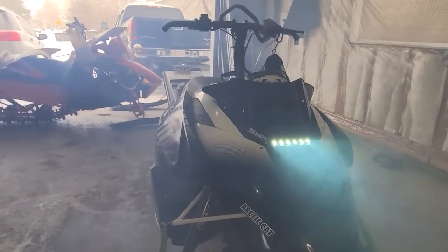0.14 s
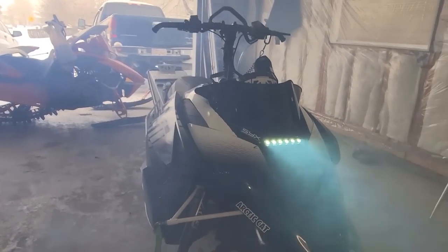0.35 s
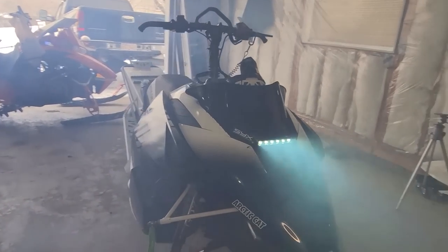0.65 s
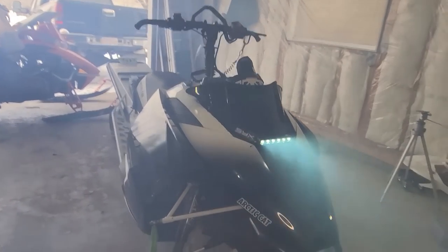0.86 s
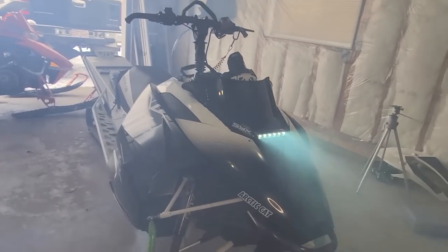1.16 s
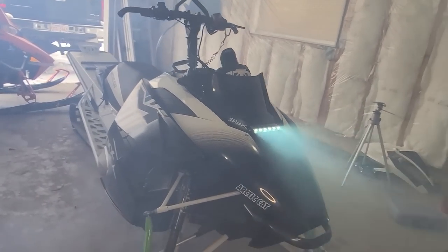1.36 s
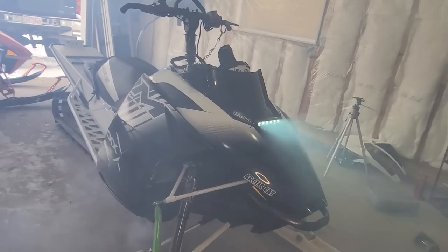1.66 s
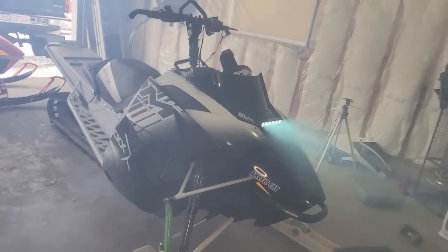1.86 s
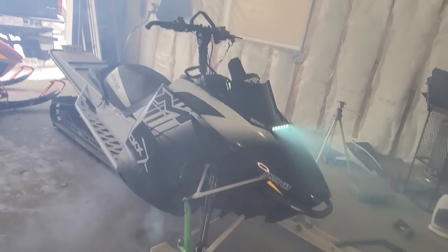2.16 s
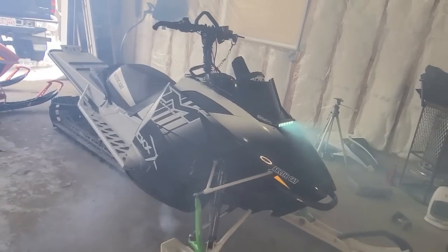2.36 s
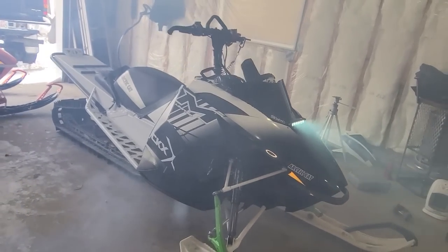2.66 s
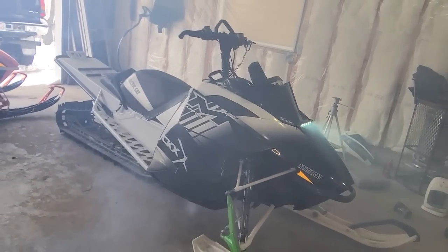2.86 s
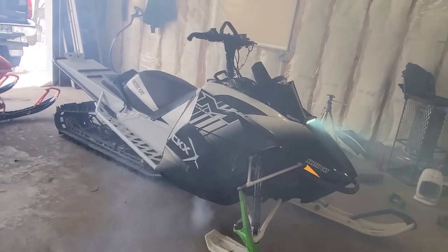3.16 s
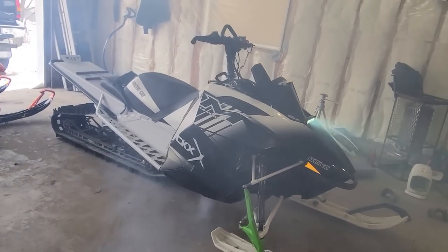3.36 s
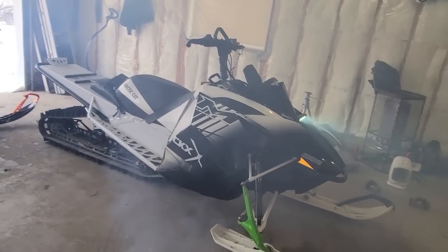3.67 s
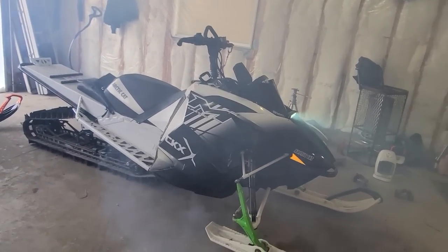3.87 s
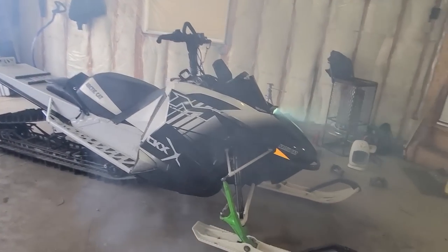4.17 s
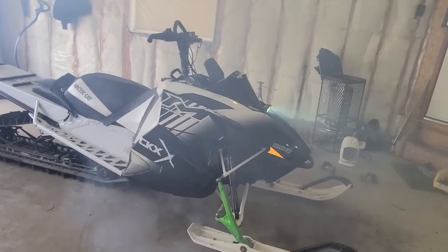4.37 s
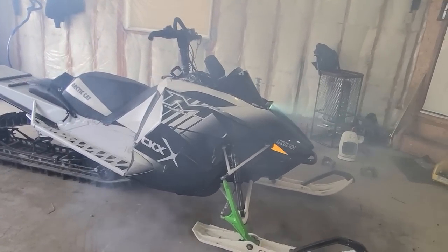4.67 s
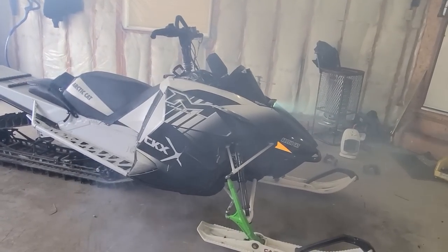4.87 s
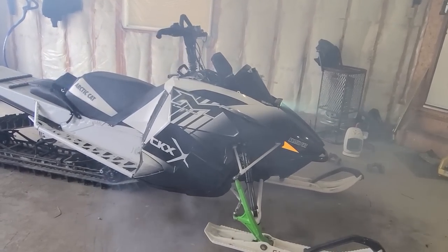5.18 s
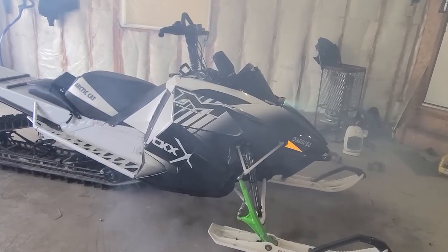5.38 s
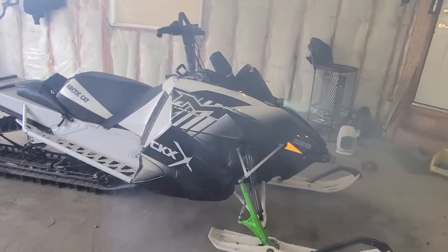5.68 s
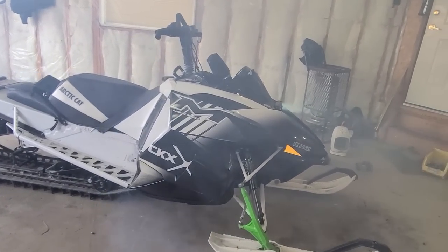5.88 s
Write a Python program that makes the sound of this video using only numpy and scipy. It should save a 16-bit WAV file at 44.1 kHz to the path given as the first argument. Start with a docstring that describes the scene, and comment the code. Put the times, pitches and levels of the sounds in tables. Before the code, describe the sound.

Indoors and close by, a snowmobile idles lumpily without revving or stopping. Boomy exhaust pops crack against a rapid pulsing hum, first a little slower and more ragged, then steadier. A clutch clanks briefly at the start, loose panels tick, and a dry garage adds a short tail. The moving stereo microphone hears tone shift from front vents towards the side.

```python
"""Uneven hard pops over a falling hum: a two-stroke snowmobile idles while the listener walks round its nose.
Only some strokes fire: each firing drives the exhaust resonances and kicks the crank up to speed.
The crank then coasts down, and its unfired strokes pump softer gas pulses through the same pipe.
Shock fronts ring the muffler shell; pistons, clutch, metal and panels clatter, with a thin high whistle.
A garage adds a short diffuse tail and a standing wave."""
import sys
import numpy as np
from scipy import signal
from scipy.fft import rfft, irfft
from scipy.io import wavfile
from scipy.ndimage import uniform_filter1d, minimum_filter1d

SR = 44100
rng = np.random.default_rng(int(sys.argv[2]) if len(sys.argv) > 2 else 0)


def store_wav(level_fs):
    """Save 16-bit WAV to argv[1]."""
    pcm = np.round(np.clip(np.atleast_2d(level_fs), -1, 1) * 32767)
    wavfile.write(sys.argv[1], SR, pcm.T.astype(np.int16))


N = 265923

# strokes that fire: [t/s, relative pop level/dB]
FIRINGS = [(0.0126, -6.5), (0.0522, -0.4), (0.071, 2.6), (0.2327, -1), (0.2875, 2.2), (0.378, -5),
           (0.4159, -7.5), (0.454, -4.5), (0.5111, 3.8), (0.5995, 2), (0.7569, 3.0), (0.8082, 4.6),
           (0.965, -7), (1.0012, 2), (1.0186, 0), (1.1673, 2), (1.2219, 3.0), (1.3452, 0.5), (1.4374, 3),
           (1.4901, 2.5), (1.65, 2.5), (1.7027, 3.5), (1.8933, 2.5), (1.9426, 0.9), (2.133, 3.5),
           (2.1496, 3.5), (2.3578, 3), (2.4072, 1.5), (2.554, 3), (2.6734, 2.5), (2.7215, 1.5),
           (2.8734, -3.3), (2.9258, 3), (2.9746, 1.5), (3.1606, 2.5), (3.1773, 2), (3.3729, 2), (3.4235, 3),
           (3.5823, 3.0), (3.6349, 2.5), (3.7932, 2.5), (3.8453, 3), (3.9997, 1.5), (4.0872, 2.5),
           (4.173, 1), (4.3016, 2), (4.3523, 2), (4.5397, 3.0), (4.5896, 3.0), (4.7365, 2), (4.7847, -0.7),
           (4.9553, 0.7), (4.9714, 3), (5.123, 0), (5.2117, 2.5), (5.2978, 0.6), (5.4235, -3), (5.479, 2),
           (5.5709, 1.5), (5.6582, 2), (5.7827, 1.2), (5.8349, 2), (6.0135, -5.5)]
# what the walk opens to the ear:
# [t/s, nose vent level/dB, airbox level/dB, buzzing bracket level/dB, body clatter level/dB]
FACING = [(0, 2, -11, -73, -29), (.6, -2, 2.5, -65, -30), (1.1, -4.5, -0.5, -58, -30.5),
          (2, -4.5, 4.5, -66, -31), (2.7, -14, 4.5, -53, -32), (3.5, -13, 4, -58, -34.5),
          (4.4, -13, 3.5, -59, -32), (5.1, -29, -5, -56, -33), (6.03, -31, -8, -65, -33)]


def from_db(db):
    """Amplitude gain is ten to the power of level/20."""
    return 10 ** (np.asarray(db) / 20)


def rms_one(x):
    """Normalise the mean power to one."""
    return x / np.sqrt(np.mean(x ** 2) + 1e-20)


def in_time(rows):
    """Linear interpolation turns each column into a per-sample curve."""
    s, *columns = np.transpose(rows)
    t = np.arange(N) / SR
    return [np.interp(t, s, column) for column in columns]


def at_hz(points, hz):
    """Interpolate a spectrum on a logarithmic frequency axis."""
    point_hz, values = np.array(points).T
    return np.interp(np.log(hz), np.log(point_hz), values)


def clicks(times, gains):
    """Unit-sample impulses, the ideal excitation, scaled by the gains."""
    at = np.round(times * SR).astype(int)
    out = np.full(N, 1e-18)
    inside = (at >= 0) & (at < N)
    np.add.at(out, at[inside], gains[inside])
    return out


def cut(x, hz, kind, order=2):
    """Butterworth low- or high-pass: a maximally flat passband."""
    sections = signal.butter(order, min(hz, .45 * SR), kind, fs=SR, output="sos")
    return signal.sosfilt(sections, x)


def resonate(x, hz, width):
    """A damped mode as a conjugate pole pair, with about unit gain at resonance."""
    r = np.exp(-np.pi * width / SR)
    zeros = np.array([1, 0, -1]) * (1 - r * r) / 2
    poles = [1, -2 * r * np.cos(2 * np.pi * hz / SR), r * r]
    return signal.lfilter(zeros, poles, x)


def fade(x, seconds):
    """Exponential relaxation: each impulse becomes a dying envelope."""
    return signal.lfilter([1], [1, -np.exp(-1 / (seconds * SR))], x)


def swell(pulses, seconds):
    """A port opens and shuts smoothly, so each gas pulse is a raised-cosine hump."""
    phase = np.clip(np.arange(-128, 129) / (seconds * SR / 2), -1, 1)
    hump = np.cos(np.pi / 2 * phase) ** 2
    return signal.fftconvolve(pulses, hump / hump.sum(), "same")


def surge(per_s):
    """Random swelling of unit rms, interpolated between independent values."""
    values = rng.standard_normal(400)
    return rms_one(np.interp(np.arange(N) * per_s / SR, np.arange(400), values))


def stereo_noise(spectrum=((20, 0), (20000, 0))):
    """Coloured noise of unit rms; interaural coherence falls from bass to treble."""
    # interaural coherence: [f/Hz, left-right likeness]
    likeness = [(400, 0.55), (800, 0.49), (1500, 0.23), (3000, 0.093), (6000, 0), (16000, 0)]
    hz = np.maximum(np.fft.rfftfreq(N, 1 / SR), 1)
    alike = np.clip(at_hz(likeness, hz), -1, 1)
    mid, side = rfft(rng.standard_normal((2, N))) * from_db(at_hz(spectrum, hz))
    ears = np.sqrt(1 + alike) * mid + np.sqrt(1 - alike) * side * [[1], [-1]]
    return rms_one(irfft(ears, N))


def unfired_strokes():
    """Friction uniformly slows the crank over a whole number of strokes between firings; times and levels."""
    # gain of the pumping hum: [t/s, relative level/dB]
    hum = [(0, 1), (.6, -1.5), (1.1, 1), (2.1, 0.8), (2.5, 2), (2.9, 2.5), (3.2, 1.5), (3.7, 0.9), (4.2, 2),
           (4.7, 3), (6.03, 5.5)]
    cold_speed, warm_speed, warm_up_s = 55.0, 58.3, 2.0  # mean idle rises, strokes per s
    coast_down = 60.0  # strokes per s lost each second
    # level at warm idle; dB per (stroke per s) faster; dB lost per s since the last firing
    pump_db, db_per_speed, sag_db_per_s = 3, 0.25, 19.5
    times, levels = [0.], [pump_db]
    for (start, _), (end, _) in zip(FIRINGS, FIRINGS[1:]):
        gap = end - start
        idle = np.interp(start, [0, warm_up_s], [cold_speed, warm_speed])
        count = max(1, round(idle * gap))
        kicked = count / gap + coast_down * gap / 2  # speed just after the firing
        speeds = np.sqrt(kicked ** 2 - 2 * coast_down * np.arange(1, count))
        since = (kicked - speeds) / coast_down
        times += list(start + since)
        levels += list(pump_db + db_per_speed * (speeds - warm_speed) - sag_db_per_s * since)
    return np.array(times), np.array(levels) + np.interp(times, *np.transpose(hum))


def pipe(pulses, modes):
    """Modal superposition: gas pulses ring a set of low resonances."""
    return sum(np.sign(polarity) * from_db(db) * resonate(pulses, hz, width)
               for hz, width, db, polarity in modes)


def exhaust(fired, pop_db, coasted, pump_db, pop_s=0.003, pump_s=0.002, pop_gain_db=1.85, echo_db=-15):
    """Impulsive excitation of pipe modes: hard pops from firings, softer puffs from strokes that miss."""
    # low resonances, each table: [f/Hz, width/Hz, relative level/dB, polarity]
    pop_modes = [(97.2, 72.6, 46.5, 1), (119.6, 137.6, 50, -1), (128.1, 17.2, 48.5, 1),
                 (173.6, 54.5, 36.5, 1), (194.2, 177.5, 46.5, 1), (236.25, 20.1, 44, 1),
                 (240.6, 72.2, 48.5, -1), (311.5, 53, 33, 1), (339, 27.4, 32, 1)]  # exhaust rung by a firing
    pump_modes = [(59.5, 4.6, 9.5, 1), (117.8, 94, 31, 1), (127.4, 20.2, 39, -1), (189, 109, 26, -1),
                  (216.4, 43, 23, 1), (276, 48, 17.5, 1)]  # exhaust rung by an unfired stroke
    nose_modes = [(81, 8.1, 39.5, 1), (102.3, 21, 36, -1), (220.3, 11, 23, 1)]  # heard through the nose vents
    airbox_modes = [(347, 28, 22.5, -1), (379.7, 31, 8, -1)]  # airbox rung by every stroke
    pump_lag_s, pipe_trip_s = .0032, .0146  # an unfired stroke puffs later than a firing pops
    nose_db, airbox_db, _, _ = in_time(FACING)
    uneven_db = rng.normal(0, .3, len(coasted))
    blasts = swell(clicks(fired, from_db(pop_db + pop_gain_db)), pop_s)
    puffs = swell(clicks(coasted + pump_lag_s, from_db(pump_db + uneven_db)), pump_s)
    pops = pipe(blasts, pop_modes)
    # each blast comes back once more after its trip along the pipe
    delayed = np.pad(pops, (round(pipe_trip_s * SR), 0))[:N]
    returned = cut(delayed, 200, "high")
    nose = from_db(nose_db) * pipe(puffs + blasts, nose_modes)
    airbox = from_db(airbox_db) * pipe(puffs + blasts, airbox_modes)
    # the muffler lets little of the gentle pumping through above its cutoff
    muffler = signal.butter(5, 410, fs=SR, output="sos")
    pumping = signal.sosfiltfilt(muffler, pipe(puffs, pump_modes) + nose + airbox)
    return pops + from_db(echo_db) * returned + pumping


def crack(fired, crack_db, gas_db=25.5, front_db=46, tail_db=-20, tail_s=0.11, spray_db=-23):
    """Shock and turbulence excite structural modes: each firing rings the muffler shell and the hood."""
    # muffler shell and hood: [f/Hz, width/Hz, relative level/dB]
    shell_modes = [(528, 22.5, 2.5), (642, 84, -2.5), (808, 130, -6), (1050, 400, -8.5), (1142, 66, 0),
                   (1316, 68, 2), (1474, 330, -5), (1552, 160, -3)]
    burst_s = .006  # decay time of the gas burst
    blows = clicks(fired, from_db(crack_db))
    envelope = fade(blows, burst_s) + from_db(tail_db) * fade(blows, tail_s)
    gas = from_db(gas_db) * stereo_noise() * envelope
    drive = gas + from_db(front_db) * blows
    # alternate modes have opposite polarity
    shell = sum((-1) ** k * from_db(db) * resonate(drive, hz, width)
                for k, (hz, width, db) in enumerate(shell_modes))
    spray = cut(cut(gas, 1500, "high"), 3000, "low", order=1)
    return shell + from_db(spray_db) * spray


def clatter(strokes, knock_s=0.0056, knock_share=0.061, surge_db=1.44):
    """Amplitude-modulated noise: piston knocks and random rattles over the surging rush of fan and intake."""
    # colour of the clatter, each table: [f/Hz, relative spectral level/dB]
    body_colour = [(30, -30), (55, -1.5), (220, -4), (380, -5.5), (460, -9.5), (586, -15), (650, -9),
                   (898, -21), (980, -12), (1310, -15), (1440, -13.5), (2200, -28), (2860, -26),
                   (4840, -120)]
    bright_colour = [(1060, -6), (1800, -1.5), (2080, -3.5), (2980, -5), (6500, -19.5), (8450, -43),
                     (14300, -120)]
    hiss_colour = [(3240, -0.5), (5500, -4.5), (6690, -5), (9740, -5), (11900, -3.5), (13700, -5.5),
                   (15100, -7), (15600, -7), (16000, -5.5)]
    bright_db, hiss_db = -42, -48  # the same all round the machine
    knocks = fade(clicks(strokes, from_db(rng.normal(0, 6.3, len(strokes)))), knock_s)
    # two independent trains at 170 chances per s
    rattles = [fade((rng.random(N) < 170 / SR) * from_db(rng.normal(0, 3, N)), .0012) for _ in range(2)]
    *_, body_db = in_time(FACING)
    rush_db = surge_db * surge(24.1)
    body_beat = rms_one(1 + knock_share * knocks)
    bright_beat = rms_one(1 + 0.29 * knocks + 0.47 * rattles[0])
    hiss_beat = rms_one(1 + 0.39 * knocks + 0.18 * rattles[0] + 0.26 * rattles[1])
    body = from_db(body_db) * stereo_noise(body_colour) * body_beat
    bright = from_db(bright_db + rush_db) * stereo_noise(bright_colour) * bright_beat
    hiss = from_db(hiss_db + rush_db) * stereo_noise(hiss_colour) * hiss_beat
    return body + bright + hiss * from_db([[.5], [2.7]])  # left and right gain, dB


def tapped(strokes, hz, width):
    """Impact excitation of one metal mode at every stroke, with random delay and strength; unit rms."""
    times = strokes + rng.uniform(0, .012, len(strokes))
    taps = fade(clicks(times, from_db(rng.normal(0, 4, len(strokes)))), .002)
    return rms_one(resonate(taps * rng.standard_normal((2, N)), hz, width))


def metal(strokes, level_db=-52, bracket_hz=5300, bracket_width=600):
    """Modal ringing: the block sounds under the pistons and one loose bracket buzzes."""
    # engine block and brackets: [f/Hz, width/Hz, relative level/dB]
    metal_modes = [(2200, 45, 4), (2494, 60, -0.5), (2942, 110, 4), (3450, 61, 1.5), (4060, 90, -1),
                   (8600, 79, -7), (10600, 180, -7), (11870, 190, -4)]
    block = sum(from_db(db) * tapped(strokes, hz, width) for hz, width, db in metal_modes)
    bracket = from_db(in_time(FACING)[2]) * tapped(strokes, bracket_hz, bracket_width)
    return from_db(level_db) * rms_one(block) + bracket


def clutch(strokes, level_db=17, ring_hz=1475, width=60, scuff_db=-35):
    """Periodic impacts ring one mode: the clutch clanks every second stroke, then dies away."""
    lead_s = 0.0083  # ahead of its stroke
    until_s, fade_db_per_s = 0.47, 30
    times = strokes[1::2] - lead_s
    hit_db = level_db - fade_db_per_s * np.maximum(0, times - until_s)
    hits = clicks(times, from_db(hit_db))
    scuff = from_db(scuff_db) * fade(hits, 0.0032) * stereo_noise()
    return resonate(hits + scuff, ring_hz, width)


def panel_ticks(strokes, level_db=-6.5):
    """Short broadband impacts: bright ticks of plastic and metal shaken by the engine."""
    # loudest ticks of loose panels: [t/s, relative level/dB]
    loud_ticks = [(0.029, -16.5), (0.3225, -24), (0.432, -24), (1.1453, -22), (2.6388, -27), (2.942, -26),
                  (3.3892, -24), (3.5976, -22)]
    tick_chance, faint_db = .04, -28  # any stroke may shake loose a fainter one
    times, tick_db = np.transpose(loud_ticks)
    shaken = rng.random(len(strokes)) < tick_chance
    hits = clicks(times, from_db(tick_db)) + clicks(strokes, shaken * from_db(faint_db))
    envelope = from_db(level_db) * fade(hits, .0015)
    return cut(stereo_noise() * envelope, 3000, "high")


def whistle(level_db=-2, hz=15086, width=110):
    """Narrow-band noise fluctuates in envelope: a thin, unsteady whistle near the top of hearing."""
    # level of the whistle: [t/s, relative level/dB]
    whistle_level = [(0, -74), (2, -72), (4.3, -69), (4.7, -57), (5.3, -66), (6.03, -68)]
    line = resonate(resonate(stereo_noise(), hz, width), hz, width)
    return from_db(in_time(whistle_level)[0] + level_db) * rms_one(line)


def garage(x, wet_db=-15):
    """Diffuse exponential decay: padded walls give a short tail, different at each ear, above the deep hum."""
    t60_s = 0.21
    t = np.arange(SR // 2) / SR
    tail = rng.standard_normal((2, len(t))) * from_db(-60 * t / t60_s) * (t > .003)
    tail /= np.sqrt(np.sum(tail ** 2, axis=1, keepdims=True))
    upper = cut(x, 220, "high", order=4)
    return from_db(wet_db) * signal.fftconvolve(upper[None], tail, axes=1)[:, :N]


def scene():
    """Linear superposition of sources that follow the same crank, with the whistle and the room."""
    # crack of a 0 dB firing as the muffler turns towards the listener and away: [t/s, relative level/dB]
    crack_level = [(0, -33), (1.4, -36), (3, -36), (4.4, -36), (5.3, -34.5), (6.03, -33.5)]
    crack_growth = 1.69  # dB of crack for each dB of pop
    fired, pop_db = np.transpose(FIRINGS)
    coasted, pump_db = unfired_strokes()
    strokes = np.sort(np.r_[fired, coasted])
    boom = cut(exhaust(fired, pop_db, coasted, pump_db), 36, "high")
    # a standing wave across the garage makes the upper boom stronger on the right
    standing = from_db(-10.0) * resonate(cut(boom, 62, "high", order=1), 335, 144) * [[-1], [1]]
    crack_db = np.interp(fired, *np.transpose(crack_level)) + crack_growth * pop_db
    machine = clatter(strokes) + metal(strokes) + clutch(strokes) + panel_ticks(strokes) + whistle()
    return boom + standing + garage(boom) + crack(fired, crack_db) + machine


def record(dry, top=0.93):
    """Peak limiting by a smoothed common gain holds the strongest pops; an elliptic low-pass cuts the top."""
    cutoff_hz = 15900
    need = np.minimum(1, top / (np.abs(dry).max(axis=0) + 1e-9))
    gain = uniform_filter1d(minimum_filter1d(need, size=301), size=301)
    low_pass = signal.ellip(10, .05, 70, cutoff_hz, fs=SR, output="sos")
    return signal.sosfiltfilt(low_pass, dry * gain)


dry = scene()
out = record(dry)
store_wav(out)
```